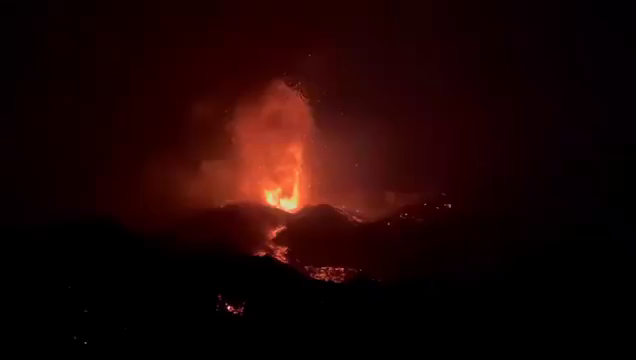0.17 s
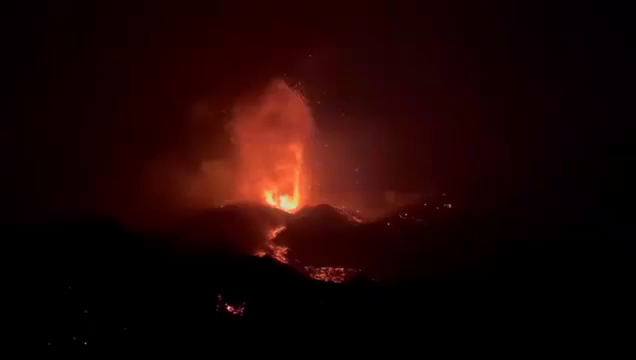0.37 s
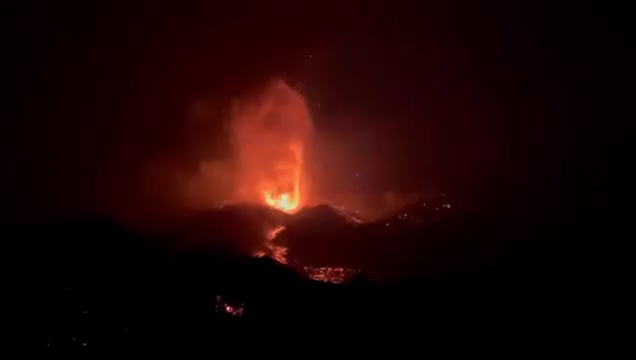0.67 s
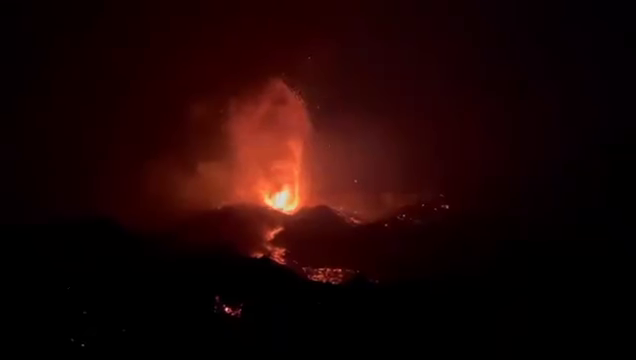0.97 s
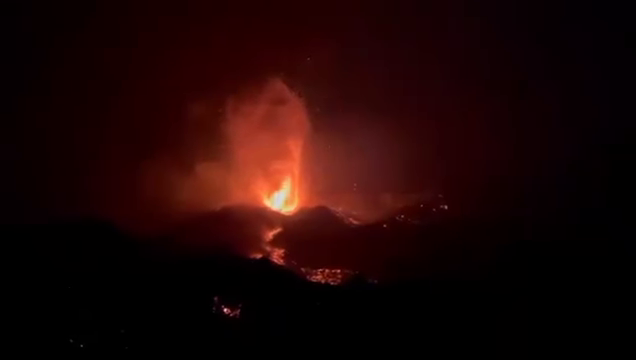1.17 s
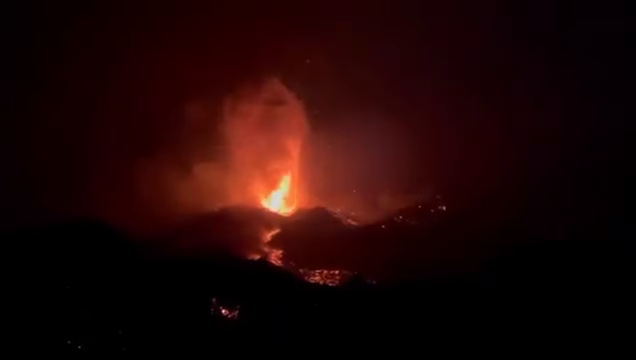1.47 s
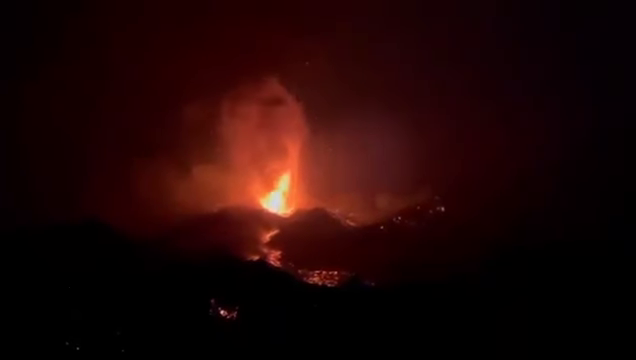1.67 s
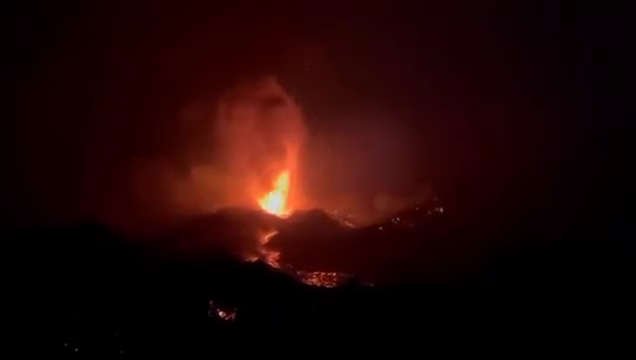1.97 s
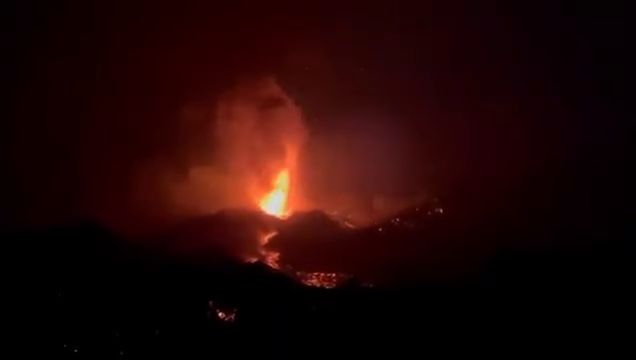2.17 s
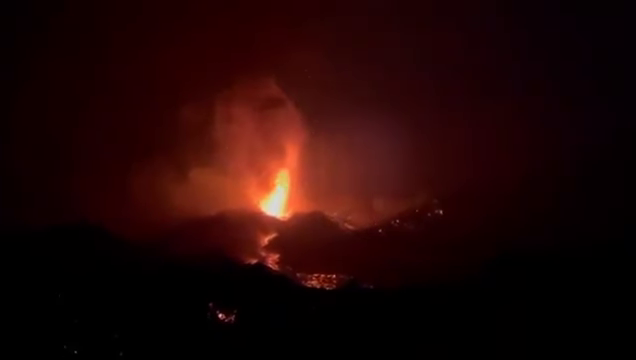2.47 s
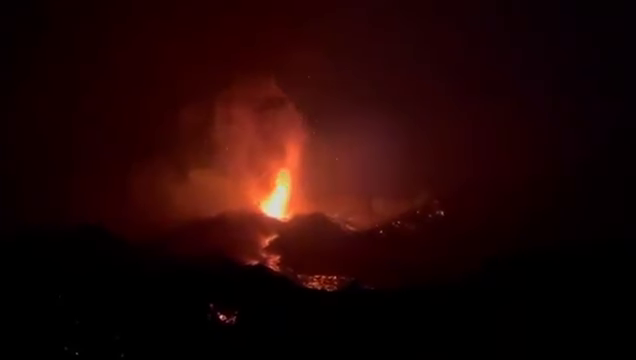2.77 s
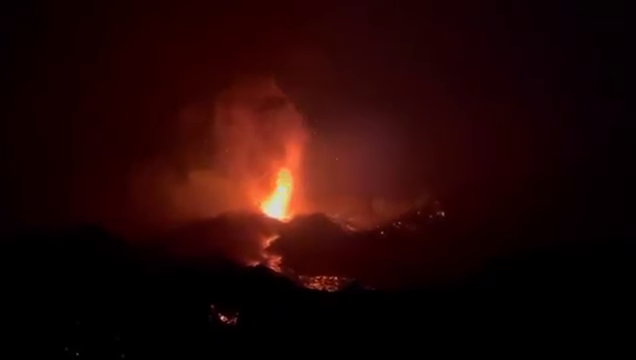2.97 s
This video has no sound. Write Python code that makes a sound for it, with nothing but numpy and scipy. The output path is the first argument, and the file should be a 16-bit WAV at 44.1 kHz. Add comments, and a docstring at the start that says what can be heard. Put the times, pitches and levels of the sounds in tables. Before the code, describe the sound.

Distant volcano eruption roars low and continuously, with deep thudding gas bursts and faint ticks.

```python
"""A distant volcano at night. After a short silence the sound cuts in abruptly: a gas jet roars as bands
of fluctuating noise, over lumpy low noise from the vent and faint microphone hiss. Deep gas bursts thud
throughout as short pulses sagging in pitch. Faint close ticks, brief rings with a snap of noise, begin
early; the jet swells once near 1.3 s and settles. Faint rustles, swells of crackly treble noise, come
mostly after it."""
import sys
import numpy as np
from scipy import signal
from scipy.io import wavfile
from scipy.ndimage import uniform_filter1d

SR = 44100
rng = np.random.default_rng(int(sys.argv[2]) if len(sys.argv) > 2 else 0)


def to_wav(s):
    """Save 16-bit WAV."""
    ch = np.atleast_2d(s).T  # columns
    pcm = np.round(np.clip(ch, -1, 1) * 32767)  # PCM
    wavfile.write(sys.argv[1], SR, pcm.astype(np.int16))


N = 137151  # length in samples

# Colours are relative spectral densities: each noise is scaled to rms 1 before its level applies.

# Hiss level over time: time_s, level_db
HISS_LEVEL = [(.22, -81.5), (.42, -81), (.55, -78.5), (.68, -77), (.78, -85), (1.2, -84.5), (1.5, -87.5),
              (1.85, -89.5), (2.1, -85.5), (2.45, -86.5), (2.8, -88), (3.1, -88)]
# Hiss colour: frequency_hz, density_db
HISS_COLOUR = [(2500, -14), (4300, 1.5), (5500, -2), (7300, -5), (7700, -31), (9200, -25), (9900, -10.5),
               (11000, -6.5), (11800, -12)]
# Faint rustles: centre_s, length_s, level_db (at the top of the swell)
RUSTLES = [(0.894, .1, -83.5), (1.98, .04, -83), (2.165, .06, -81), (2.22, 0.045, -86), (2.286, 0.047, -83),
           (2.332, 0.084, -82), (2.49, 0.054, -90), (2.555, .06, -83.5), (2.623, 0.058, -89),
           (2.743, .08, -84), (2.9, .06, -83.5), (2.96, 0.085, -86)]
# Faint ticks: start_s, ring_level_db, pitch_hz, decay_60db_s (before the closing taper),
# snap_gain_db (on band-passed noise, against the ring)
TICKS = [(.3695, -68, 4000, .02, -3), (.5357, -74, 4600, .025, 0), (.632, -67, 4220, .025, 3),
         (.632, -70, 5600, .03, -2), (.632, -69, 7100, 0.025, 2), (.883, -79.5, 3850, .027, 1.5),
         (1.1365, -72.5, 4240, .03, 4), (1.77, -74, 4700, .08, -20), (2.855, -81, 4600, .09, -9)]
# Rumble level over time: time_s, level_db
RUMBLE_LEVEL = [(.22, -36.5), (.45, -47.5), (.62, -41), (.8, -37), (1.1, -45), (1.4, -38.5), (1.7, -34.5),
                (2.1, -36.5), (2.3, -34), (2.42, -43), (2.6, -37), (2.9, -30), (3.1, -32)]
# Rumble colour: frequency_hz, density_db
RUMBLE_COLOUR = [(12, -31.5), (25, -30.5), (40, -3), (52, -8), (90, -3), (140, -8), (200, -8.5),
                 (320, -37.5)]
# Gas bursts, each a short low thud: peak_s, peak_db, pitch_hz (at the peak)
THUDS = [(0.311, -32.5, 70.6), (0.551, -41, 70), (.70, -33, 75), (.763, -25, 200), (0.777, -22.5, 85),
         (.88, -27, 130), (.905, -29.5, 70), (1.022, -24.5, 270), (1.089, -24, 300), (1.211, -23.5, 290),
         (1.218, -28, 81.6), (1.277, -20, 230), (1.286, -33, 71.7), (1.3065, -16.5, 302),
         (1.335, -23.5, 243), (1.389, -34.5, 90), (1.411, -28, 130), (1.475, -20, 210), (1.53, -31.5, 69),
         (1.546, -24, 150), (1.63, -30.5, 75), (1.737, -21, 70), (1.782, -19, 150), (1.791, -25.5, 60),
         (1.825, -30, 60), (1.899, -30, 220), (1.915, -20.5, 92), (1.958, -23.5, 80), (2.016, -24, 115),
         (2.043, -23, 100), (2.175, -21, 85), (2.216, -24.5, 70), (2.258, -20, 61.3), (2.284, -19, 140),
         (2.335, -12, 92.7), (2.439, -25, 80), (2.473, -23.5, 78.6), (2.519, -24.5, 66), (2.619, -25.5, 58),
         (2.75, -22, 125), (2.789, -24.5, 90), (2.84, -27, 62), (2.856, -24, 65.4), (2.872, -22, 61.4),
         (2.899, -30.5, 85), (2.977, -22, 260), (3.043, -22, 55), (3.095, -21.5, 95)]
# Jet roar level over time: time_s, body_db, upper_db, rush_db
JET_LEVEL = [(.22, -38.5, -41, -52.5), (.42, -38, -42.5, -54), (.56, -38, -43.5, -52.5),
             (.74, -32, -38.5, -47.5), (.96, -33, -34.5, -45), (1.08, -34, -35, -44.5),
             (1.2, -32, -31, -42.5), (1.3, -28, -30, -41.5), (1.42, -29.5, -36, -46),
             (1.52, -32, -34.5, -48), (1.64, -32.5, -38, -51.5), (1.82, -35.5, -43, -54.5),
             (2.04, -32, -42, -53.5), (2.18, -36, -41, -52), (2.36, -34, -41, -52.5),
             (2.7, -33.5, -40, -52), (2.86, -35.5, -41, -51.5), (3.1, -35, -39.5, -50)]
# Roar colour after kilometres of air and a ground bounce, body then upper: frequency_hz, density_db
JET_BODY_COLOUR = [(60, -22.5), (130, -14), (160, -6.5), (190, -6), (230, 0.5), (300, -1), (400, -4.5),
                   (480, -17), (700, -17.5)]
JET_UPPER_COLOUR = [(300, -26.5), (450, 0.5), (520, 0.5), (680, -1), (760, -4.5), (1030, -6), (1140, -15.5),
                    (1300, -30)]
# Colour of the bright rush of the jet: frequency_hz, density_db
JET_RUSH_COLOUR = [(950, -18), (1140, -4), (1430, 0.5), (1560, -6), (1690, -15), (1830, -9), (2160, -11),
                   (2700, -18.5), (3400, -28), (4000, -44), (5000, -60)]

TICK_RISE_S = 0.00075
TICK_BLUR_HZ = 249  # rms wander of the ring's pitch
TICK_HOLD = 0.18  # hold before the decay, as a share of the decay time
THUD_CYCLES = 0.77  # standard deviation of the Gaussian envelope, in cycles
THUD_SAG = 0.52  # share by which the pitch falls per cycle, near the peak
START_S = 0.207  # silence before this
BASS_HZ, EDGE_HZ = 35.2, 12200  # the microphone loses bass below the first; upper band limit


def gain_of(db):
    """Logarithmic level: 20 dB is a factor of ten in amplitude."""
    return 10 ** (np.asarray(db) / 20)


def evened(x):
    """Normalisation by mean power: scales to rms 1."""
    return x / np.sqrt(np.mean(x ** 2) + 1e-20)


def smoothed_twice(x, size, axis=-1):
    """Low-pass smoothing: two running means in cascade."""
    once = uniform_filter1d(x, size=size, axis=axis)
    return uniform_filter1d(once, size=size, axis=axis)


def level(table, column=1):
    """Amplitude envelope: interpolates a dB column over time and converts it to gain."""
    rows = np.array(table)
    return gain_of(np.interp(np.arange(N) / SR, rows[:, 0], rows[:, column]))


def add(mix, start_s, sound):
    """Superposition: adds a sound to the mix from a given time."""
    part = mix[round(start_s * SR):][:len(sound)]
    part += sound[:len(part)]


def bandpass(x, order, low_hz, high_hz):
    """Band selection: a Butterworth filter passes only the middle band."""
    return signal.sosfilt(signal.butter(order, [low_hz, high_hz], "band", fs=SR, output="sos"), x)


def turbulence(colour, patchy_db, flicker_db, size):
    """Random-phase noise: a coloured spectrum with drifting patches and a flutter common to all bands."""
    hop = size // 4
    hz = np.fft.rfftfreq(size, 1 / SR)
    real, imaginary, patches = rng.standard_normal((N // hop + 5, len(hz), 3)).T
    # Rows are frequencies and columns are frames.
    patches = uniform_filter1d(uniform_filter1d(patches, size=8, axis=0), size=8, axis=1)
    patches = evened(patches)
    colour_hz, colour_db = np.transpose(colour)
    density_db = np.interp(np.log(hz + 1), np.log(colour_hz + 1), colour_db, -90, -90)
    spectrum = (real + 1j * imaginary) * gain_of(density_db[:, None] + patchy_db * patches)
    noise = signal.istft(spectrum, nperseg=size, noverlap=size - hop)[1][:N]
    flutter = evened(smoothed_twice(rng.standard_normal(N), 1500))
    return evened(noise * gain_of(flicker_db * flutter))


def hiss():
    """Stationary noise floor made uneven: faint, patchy coloured noise."""
    return level(HISS_LEVEL) * turbulence(HISS_COLOUR, patchy_db=1.8, flicker_db=0.6, size=1024)


def rustles():
    """Amplitude modulation: fast level changes make treble noise crackle and slow swells shape it."""
    swell = np.zeros(N)
    for centre_s, length_s, level_db in RUSTLES:
        add(swell, centre_s - length_s / 2, gain_of(level_db) * np.hanning(round(length_s * SR)))
    flicker = evened(uniform_filter1d(rng.standard_normal(N), size=150))
    crackle = gain_of(3.0 * flicker) * rng.standard_normal(N)
    return swell * evened(bandpass(crackle, 6, 3400, 6900))


def ticks():
    """Damped resonance: a short ring of wandering pitch dies away with a snap of noise."""
    out, t = np.zeros(N), np.arange(3000) / SR
    noise, wander = rng.standard_normal((len(TICKS), 2, len(t))).transpose(1, 0, 2)
    snaps = bandpass(noise, 8, 3300, 7000)
    taper = np.cos(np.pi * t / t[-1] / 2) ** 2
    for (start_s, ring_db, hz, decay_s, snap_db), snap, drift in zip(TICKS, snaps, wander):
        pitch_hz = hz + TICK_BLUR_HZ * evened(uniform_filter1d(drift, size=60))
        ring = np.sin(2 * np.pi * np.cumsum(pitch_hz) / SR)
        rise = np.minimum(t / TICK_RISE_S, 1)
        decay = gain_of(-60 * np.maximum(t / decay_s - TICK_HOLD, 0))
        add(out, start_s, gain_of(ring_db) * rise * decay * taper * (ring + gain_of(snap_db) * snap))
    return out


def rumble():
    """Low-frequency turbulence: lumpy noise from deep in the vent."""
    return level(RUMBLE_LEVEL) * turbulence(RUMBLE_COLOUR, patchy_db=1.9, flicker_db=1.5, size=4096)


def thuds():
    """Transient pressure pulse: each gas burst is about two cycles under a Gaussian, sagging in pitch."""
    out, t = np.zeros(N), np.arange(-2000, 4000) / SR  # t = 0 at the peak
    for peak_s, peak_db, hz in THUDS:
        cycles = t * hz
        turns = cycles * np.exp(-THUD_SAG * np.clip(cycles, -2, 2) / 2)
        envelope = np.exp(-(turns / THUD_CYCLES) ** 2 / 2)
        add(out, peak_s + t[0], gain_of(peak_db) * envelope * np.cos(2 * np.pi * turns))
    return out


def jet():
    """Turbulent jet noise: a body, an upper roar and a bright rush swell by different amounts."""
    body = turbulence(JET_BODY_COLOUR, patchy_db=0.97, flicker_db=1.27, size=2048)
    upper = turbulence(JET_UPPER_COLOUR, patchy_db=0.82, flicker_db=-0.17, size=1024)
    rush = turbulence(JET_RUSH_COLOUR, patchy_db=0.75, flicker_db=0.1, size=1024)
    return level(JET_LEVEL, 1) * body + level(JET_LEVEL, 2) * upper + level(JET_LEVEL, 3) * rush


def scene():
    """Linear superposition: the sum of all sources, in mono."""
    return (hiss() + rustles() + ticks() + rumble() + thuds() + jet())[None]


def record(dry):
    """Band limitation: bass roll-off, then the abrupt start, then an upper cut-off."""
    thin = signal.sosfiltfilt(signal.butter(2, BASS_HZ, "high", fs=SR, output="sos"), dry)
    cut = thin * (np.arange(N) >= START_S * SR)
    lowpass = signal.firwin(511, EDGE_HZ, window=("kaiser", 9), fs=SR)
    return signal.oaconvolve(cut, lowpass[None], "same")


dry = scene()
out = record(dry)
to_wav(out)
```